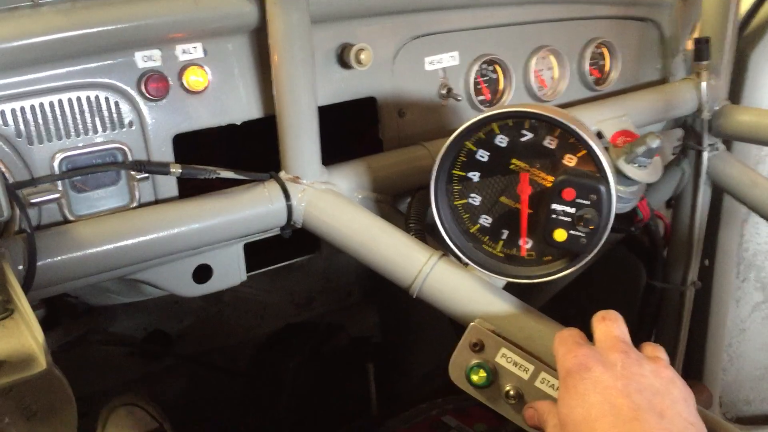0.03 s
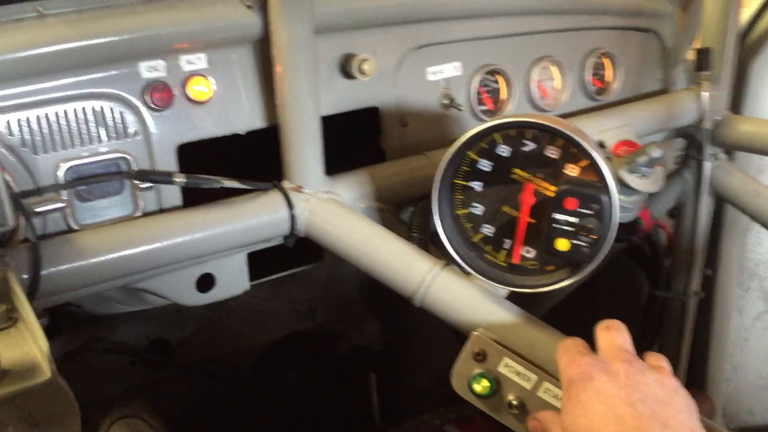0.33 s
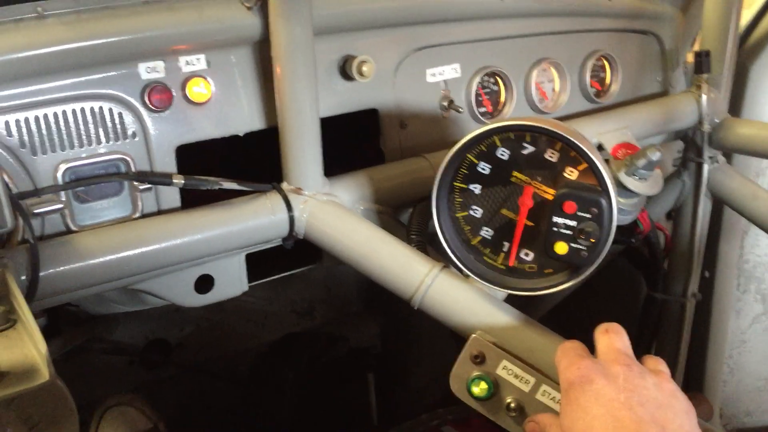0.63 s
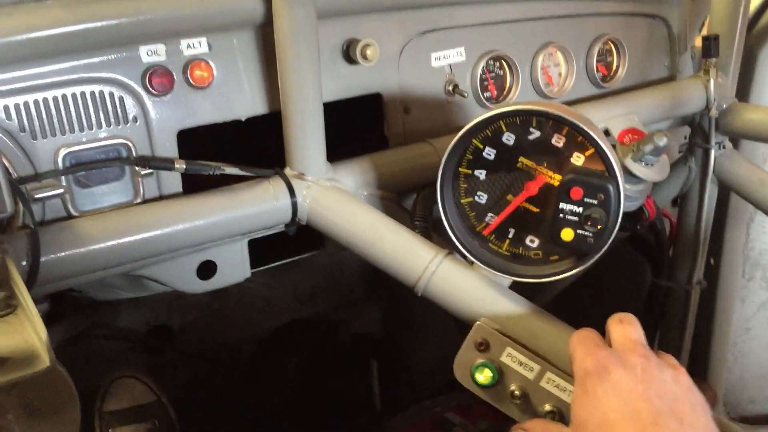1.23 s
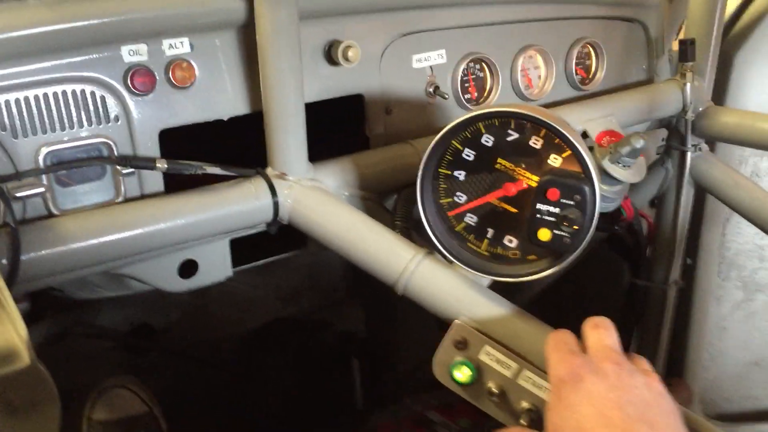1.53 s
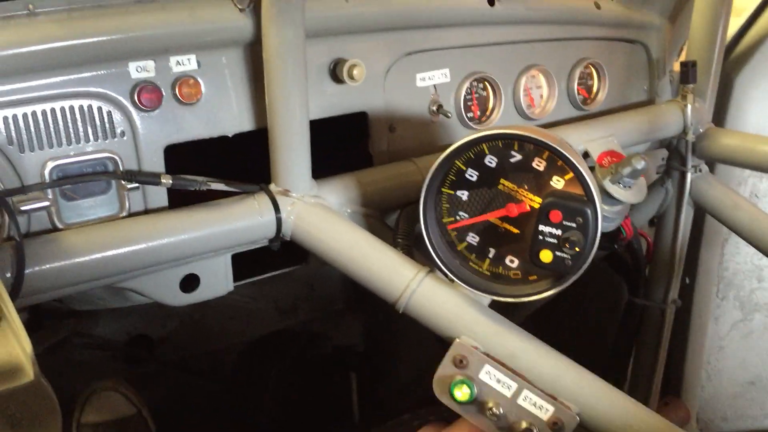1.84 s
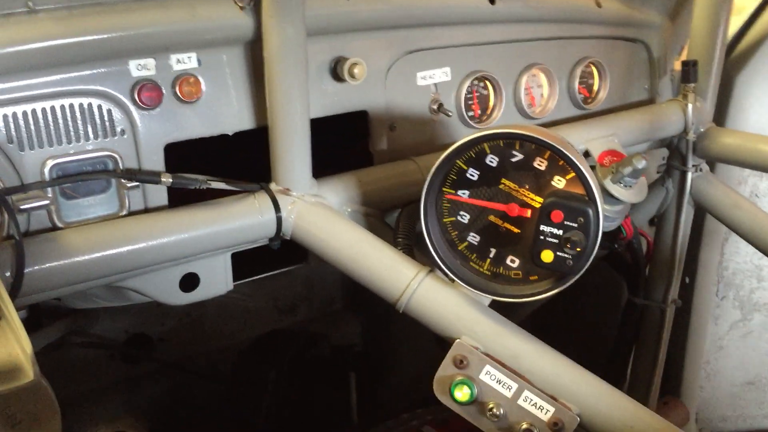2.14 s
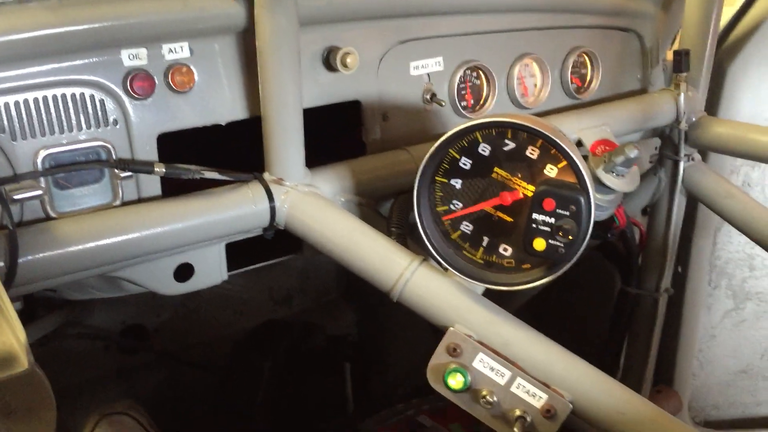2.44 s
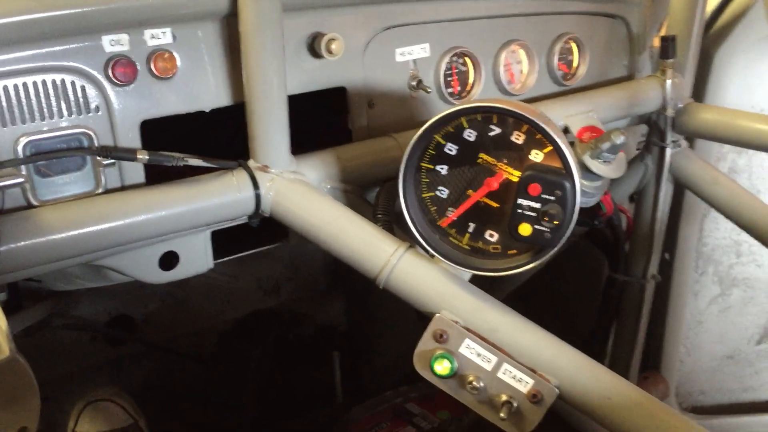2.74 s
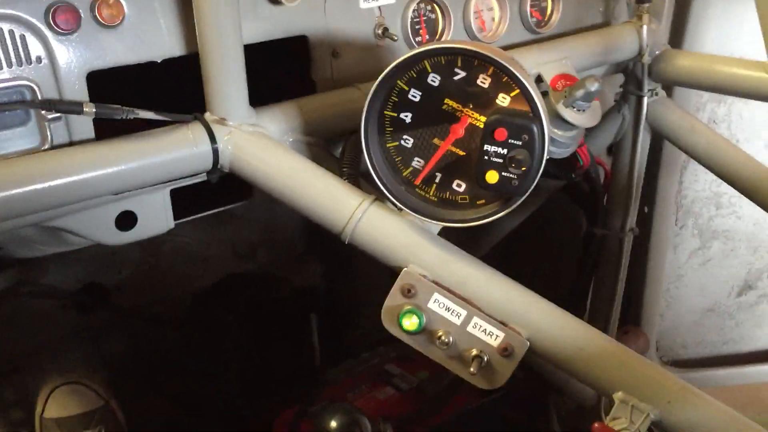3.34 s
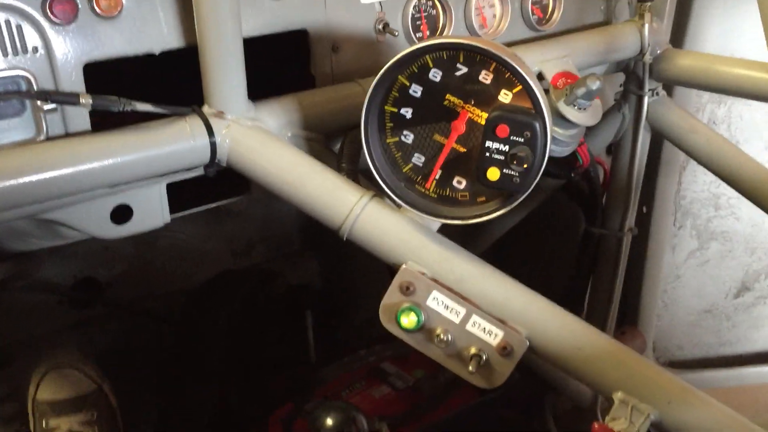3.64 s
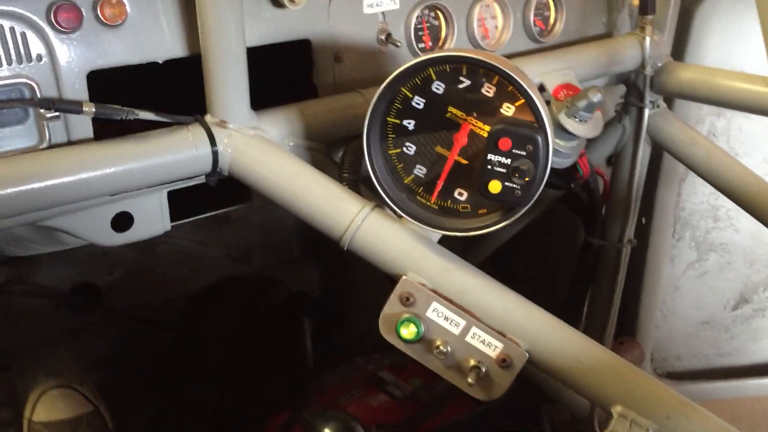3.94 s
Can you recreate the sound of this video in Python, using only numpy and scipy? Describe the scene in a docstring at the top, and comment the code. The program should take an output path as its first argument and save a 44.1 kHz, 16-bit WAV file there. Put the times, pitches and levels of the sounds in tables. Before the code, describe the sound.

A four-cylinder car engine is cranked by a grinding starter, fires unevenly with a bang, revs with a booming, raspy exhaust and sinks into rough chugs. The microphone is inside the resonant metal cabin and overloads slightly on peaks.

```python
"""Inside the bare steel cabin of a race car, a four-cylinder engine starts. A switch clicks over the
fuel pump, the starter's gear teeth grind and the first cylinders thump, one with a bang. The engine
catches, is revved once and falls to a lumpy idle that surges, then sags into separate chugs. Its
firings boom through the exhaust, their puffs of gas rasp and hiss, and the steel panels resonate.
The loudest peaks overload the microphone."""
import sys
import numpy as np
from scipy import signal
from scipy.fft import rfft, irfft
from scipy.io import wavfile
from scipy.ndimage import uniform_filter1d, map_coordinates

SR = 44100
rng = np.random.default_rng(int(sys.argv[2]) if len(sys.argv) > 2 else 0)


def wrap_up_sound(samples):
    """Save the sound to the file named by the first command line argument, as 16-bit audio."""
    columns = np.atleast_2d(samples).T
    # keep every value between -1 and 1, then stretch to whole-number steps
    tamed = np.clip(columns, -1, 1)
    steps = np.round(tamed * 32767).astype(np.int16)
    wavfile.write(sys.argv[1], SR, steps)


N = 176400

# The exhaust as it booms in the cabin. Each row: frequency in Hz, gain in dB.
PIPE_RESPONSE = [(25,-26.5),(52,-12.5),(80,-10),(105,-5.5),(135,-5.5),(162,3.5),(192,1.5),(240,-2),(285,-13),(370,-11.5),(445,-15),(900,-54.5)]
# Rasp and hiss of escaping gas. Each row: frequency in Hz, relative spectral density in dB.
RASP_SPECTRUM = [(120,-30.5),(300,1.5),(370,4),(460,2),(590,5),(850,-0.5),(1400,-1),(2200,-7.5),(3500,-11),(15000,-39)]
HISS_SPECTRUM = [(700,-23),(1500,2.5),(2800,2),(4200,0),(5000,-5.5),(6000,0),(7400,-7.5),(8700,-2.5),(10500,-10.5),(15500,-13)]


def undb(db):
    """Decibels to amplitude ratio."""
    return 10 ** (np.asarray(db) / 20)


def unit(x):
    """Scale to rms 1."""
    return x / np.sqrt(np.mean(x ** 2))


def steady(x):
    """Hold the rms over 50 ms at 1."""
    return x / np.sqrt(uniform_filter1d(x ** 2, size=2200) + 1e-9)


def clock():
    """Sample times in seconds."""
    return np.arange(N) / SR


def curve(table, column=1):
    """Linear interpolation of one column in time."""
    rows = np.array(table)
    return np.interp(clock(), rows[:, 0], rows[:, column])


def strike(start, decay, attack=0.00049, hold=0):
    """Linear rise, then exponential decay from start + hold; all in seconds."""
    age = clock() - start
    return np.clip(age / attack, 0, 1) * np.exp(-np.maximum(age - hold, 0) / decay)


def noise():
    """White Gaussian noise."""
    return rng.standard_normal(N)


def walk(rate):
    """Random drift of rms 1, with `rate` new values a second."""
    step = int(SR / rate)
    return unit(uniform_filter1d(np.repeat(noise()[:N // step + 1], step), step)[:N])


def repeating(turns):
    """Periodic noise: a rough pattern recurs at every turn of a shaft."""
    return unit(map_coordinates(noise(), [turns % 1 * N / turns[-1]], order=3))


def response(spectrum, hz):
    """Gain of a spectrum, interpolated in log frequency."""
    knots_hz, db = np.array(spectrum).T
    return undb(np.interp(np.log(np.maximum(hz, 1)), np.log(knots_hz), db))


def colour(x, spectrum):
    """Minimum-phase filter: folding the cepstrum makes it causal."""
    cepstrum = irfft(np.log(response(spectrum, np.arange(N + 1) * SR / (2 * N))))
    cepstrum[1:N] *= 2
    cepstrum[N + 1:] = 0
    return irfft(rfft(x, 2 * N) * np.exp(rfft(cepstrum)))[:N]


def resonate(x, hz, width_hz):
    """One resonance, gain 1 at its centre."""
    return signal.lfilter(*signal.iirpeak(hz, hz / width_hz, fs=SR), x)


def cabin(x):
    """Panel resonance and short reverberation off bare walls, which shifts as the microphone sways."""
    # Modes of the steel panels. Each row: frequency in Hz, gain in dB.
    panel_modes = [(368,4.5),(544,-2.5),(638,-2),(750,-3),(1030,3),(1183,2),(1297,2),(1373,-4.5),(1510,4),(1775,-0.5),(1978,-0.5),(2238,0),(2540,2.5)]
    t60_s, echo_db, sway_hz = 0.074, -5.5, 1.91
    x = x + sum(undb(db) * resonate(x, hz, width_hz=19.2) for hz, db in panel_modes)
    t = clock()[:SR // 4]
    tails = rng.standard_normal((2, len(t))) * np.exp(-np.log(1000) * t / t60_s)
    here, there = (signal.fftconvolve(x, tail / np.linalg.norm(tail))[:N] for tail in tails)
    sway = 2 * np.pi * sway_hz * clock()
    return x + undb(echo_db) * (np.cos(sway) * here + np.sin(sway) * there)


def fuel_pump():
    """A rotating machine radiates a tone over broadband noise."""
    # The pump's whirr. Each row: frequency in Hz, relative spectral density in dB.
    whirr_spectrum = [(40, -12), (298, -11), (1400, -9.5), (15000, -41)]
    hum_hz = 310.7
    hum = undb(-43.5) * unit(np.sin(2 * np.pi * hum_hz * clock()))
    whirr = undb(-33) * unit(colour(noise(), whirr_spectrum))
    return strike(0.037, decay=0.17, hold=1.0) * (hum + whirr)


def start_switch():
    """A brief impact has a broad spectrum: a bright click."""
    bright = unit(colour(noise(), [(1500, -41), (10000, 6), (15000, 5)]))
    return undb(-23) * strike(0.1237, decay=0.0065) * bright


def pinion():
    """Damped resonance: the pinion rings as it engages."""
    ring = unit(resonate(noise(), hz=2120, width_hz=400))
    return undb(-17.5) * strike(0.153, decay=0.03, attack=0.0052) * ring


def starter():
    """Gear-mesh noise: teeth grind on the flywheel, louder, slower and brighter at each compression."""
    # Compressions that load the starter. Each row: peak time in seconds, dB over the free run.
    compressions = [(0.256,2.5),(0.37,6.5),(0.437,4.5),(0.558,2.5),(0.664,8),(0.797,4.5),(.9,9),(0.996,5.5)]
    # Gear grind and motor growl. Each row: frequency in Hz, relative spectral density in dB.
    grind_spectrum = [(40,2),(70,16.5),(130,11),(210,12.5),(320,-1.5),(700,-2.5),(950,-4.5),(2000,-2.5),(3100,-2),(4500,-2),(6500,-6.5),(7600,-11.5),(9500,-13),(10500,-19.5),(15500,-25)]
    growl_spectrum = [(250,-19.5),(560,-8),(690,4.5),(800,-2),(1400,-10),(4000,-62)]
    mesh_hz, rise_hz_per_s, sag_hz_per_db, teeth = 195, 40, 3.5, 9
    t = clock()
    strain_db = sum(db * np.exp(-0.5 * ((t - peak) / 0.027) ** 2) for peak, db in compressions)
    level = undb(-21.5 + strain_db) * strike(0.14, decay=0.013, attack=0.016, hold=0.89)
    meshings = np.cumsum(mesh_hz + rise_hz_per_s * t - sag_hz_per_db * strain_db) / SR
    whine = repeating(meshings / teeth)
    grind = unit(colour(cabin(noise() + undb(-7) * whine), grind_spectrum))
    # The motor growls as it takes up the load.
    take_up = undb(-24) * strike(0.155, decay=0.034, attack=0.0066, hold=0.15)
    growl = unit(colour(cabin(noise() + whine), growl_spectrum))
    highpass = signal.butter(2, 7000, "high", fs=SR, output="sos")
    scrape = undb(-26 + strain_db) * unit(signal.sosfilt(highpass, noise()))
    return level * (grind + scrape) + take_up * growl


def first_firings():
    """Pressure transients: lone cylinders thump and crack, and unburnt fuel bangs in the pipe."""
    # Lone firings. Each row: start in seconds, level in dB.
    firings = [(0.18,-9),(0.376,-6.5),(0.42,1.5),(0.656,-5),(0.703,-10.5),(0.884,-6),(0.92,2),(0.994,-0.5),(1.023,2.5),(1.051,4),(1.134,-8.5),(1.16,-7),(1.199,-2),(1.285,-4.5)]
    # The thump rises as the engine catches. Each row: time in seconds, frequency in Hz.
    thump_pitch = [(.92,111.4),(1.05,130)]
    # Bangs in the exhaust. Each row: start in seconds, level in dB, decay in seconds.
    bangs = [(.424,-13,0.016),(1.024,-0.5,0.015),(1.056,-19.5,0.015),(1.163,-20.5,0.0099),(1.306,-11.5,0.0074),(1.362,-11.5,0.0099),(1.412,-14.5,0.015),(1.457,-6.5,.011),(1.793,-10,0.0083)]
    rise_s, ring_s, ring_hz = 0.0064, 0.012, 157.8
    thumps, crack_level = 0, 0
    for start, db in firings:
        age = np.maximum(clock() - start, 0)
        hz = np.interp(start, *zip(*thump_pitch))
        pulse = (age / rise_s) ** 2 * np.exp(2 - 2 * age / rise_s) * np.sin(2 * np.pi * hz * age)
        ring = age / ring_s * np.exp(1 - age / ring_s) * np.sin(2 * np.pi * ring_hz * age)
        thumps += undb(db) * (pulse + undb(-12.5) * ring)
        crack_level += undb(db - 28) * strike(start, decay=0.0057)
    bang_level = sum(undb(db) * strike(start, decay, attack=0.003) for start, db, decay in bangs)
    hiss = (crack_level + undb(-12.5) * bang_level) * unit(colour(noise(), HISS_SPECTRUM))
    return thumps + hiss + bang_level * unit(colour(cabin(noise()), RASP_SPECTRUM))


def chug_envelopes():
    """The idle's strong firings add in power: one envelope for their boom, one for their spit."""
    # Each row: start in seconds, boom in dB, spitting hiss in dB.
    chugs = [(2.817,-12.5,-31),(2.857,-11.5,-29),(2.891,-15.5,-32),(2.973,-15,-29),(3.013,-14.5,-29.5),(3.048,-16.5,-30),(3.11,-25,-32),(3.131,-15,-28),(3.16,-15.5,-30.5),(3.203,-14.5,-29),(3.244,-15,-35),(3.277,-15,-29),(3.303,-17.5,-42),(3.435,-30,-36),(3.51,-23.5,-53),(3.533,-31,-34.5),(3.62,-32,-34),(3.65,-18.5,-32),(3.709,-29,-32),(3.74,-19.5,-34),(3.77,-17.5,-30),(3.797,-18,-35.5),(3.865,-23,-28.5),(3.897,-18,-26),(3.965,-24,-27)]
    boom_power, spit_power = 0, 0
    for start, boom_db, spit_db in chugs:
        boom_power += (undb(boom_db) * strike(start, decay=0.033, attack=0.0055, hold=0.0055)) ** 2
        spit_power += (undb(spit_db) * strike(start, decay=0.03, attack=0.008)) ** 2
    return np.sqrt(boom_power), np.sqrt(spit_power)


def pipe_ring(x):
    """The pipe rings at its modes, each formed by two resonators in cascade."""
    # Each row: frequency in Hz, width of one resonator in Hz, level in dB.
    pipe_modes = [(161.6,99.6,0.5),(369,104,-15.5)]
    return sum(undb(db) * steady(resonate(resonate(x, hz, width), hz, width))
               for hz, width, db in pipe_modes)


def exhaust(firing_hz, firings, scatter):
    """Source and filter: the pipe shapes firing harmonics, uneven kicks and turbulent gas."""
    # Source level in dB of each harmonic of the firing rate, fundamental first.
    harmonics_db = [0.5, 0.5, -5, -7, -4, -8.5]
    # How far each cylinder strays from the mean strength, in relative units.
    cylinder_bias = [0.98, -1.3, 0.43, 0.015]
    # Unevenness of the firings. Each row: time in seconds, roughness from 0 to 1.
    roughness = [(1.35,0.74),(1.7,0.57),(1.88,0.44),(2.07,0.9),(2.33,0.43),(2.55,0.56),(2.9,0.42),(3.7,0.7)]
    dispersion_rad = 0.827  # pipe and cabin delay each harmonic differently and smear the pulse
    harmonics = 0
    for k, db in enumerate(harmonics_db):
        gain = undb(db) * response(PIPE_RESPONSE, (k + 1) * firing_hz)
        harmonics += gain * np.sin(2 * np.pi * (k + 1) * firings - dispersion_rad * k ** 2)
    cycle = np.maximum(firings, 0).astype(int)
    kicks = np.diff(cycle, prepend=0) * (scatter + np.array(cylinder_bias)[cycle % len(cylinder_bias)])
    uneven = steady(colour(unit(kicks) + noise(), PIPE_RESPONSE))
    rough = curve(roughness)
    return np.sqrt(1 - rough ** 2) * steady(harmonics) + rough * uneven


def engine():
    """Periodic combustion: each firing drives the exhaust, and its puff of gas modulates the noise."""
    # Engine speed. Each row: time in seconds, firings per second.
    speed = [(1.1,41.6),(1.3,58),(1.36,69.4),(1.45,90),(1.52,103.7),(1.63,88),(1.77,64),(1.88,96.4),(1.94,108),(2.02,120.5),(2.1,134),(2.28,119),(2.39,101),(2.5,79),(2.61,74),(2.77,55.8),(3.0,52.4),(3.24,54.3),(4,54)]
    # The running engine. Each row: time in seconds, then boom, rasp and treble hiss in dB.
    effort = [(1.1,-24,-27.5,-36),(1.275,-18,-30,-38),(1.305,-11.5,-20,-35),(1.39,-11.5,-22,-37),(1.49,-14.5,-21.5,-28.5),(1.6,-21.5,-28.5,-47),(1.775,-22.5,-32.5,-46),(1.8,-12.5,-21.5,-25.5),(1.9,-9.5,-11,-18.5),(1.955,-10,-15.5,-23),(2.04,-13.5,-11.5,-18),(2.11,-16.5,-12.5,-25),(2.16,-19.5,-19.5,-27),(2.33,-14,-21,-22),(2.44,-25,-26,-36),(2.59,-19,-30,-41),(2.72,-27,-34.5,-46.5)]
    wobble_cycles, puff_cycles, clatter_scatter_db = 0.04, 0.2, 2
    firing_hz = curve(speed)
    firings = np.cumsum(firing_hz) / SR + wobble_cycles * walk(30)
    cycle = np.maximum(firings, 0).astype(int)
    scatter, valve_scatter = np.sqrt(3) * rng.uniform(-1, 1, (N // 100, 2))[cycle].T
    running = np.clip((clock() - effort[0][0]) / 0.029 + 1, 0, 1)
    boom_level, rasp_level, hiss_level = (running * undb(curve(effort, k)) for k in (1, 2, 3))
    chug_level, spit_level = chug_envelopes()

    pipe = exhaust(firing_hz, firings, scatter)
    boom = boom_level * pipe + chug_level * pipe_ring(pipe)
    # The firing rate hums on with the throttle shut.
    fundamental = unit(np.sin(2 * np.pi * firings) * (1 + 0.3 * scatter))
    drone = running * undb(-24) * response(PIPE_RESPONSE, firing_hz) * fundamental

    puffs = 1 + np.exp(-(firings % 1) / puff_cycles)
    # Part of the rasp repeats with each crank turn, which is two firings.
    each_turn = unit(map_coordinates(noise(), [firings % 2 * SR / firing_hz.max()], order=1))
    gas = steady(colour(cabin(puffs * (noise() + 0.71 * each_turn)), RASP_SPECTRUM))
    rasp = np.hypot(rasp_level, undb(-14.5) * chug_level) * gas
    valves = puffs * undb(clatter_scatter_db * valve_scatter) * noise()
    clatter = hiss_level * unit(colour(cabin(valves), HISS_SPECTRUM))
    spit = spit_level * unit(colour(cabin(noise()), HISS_SPECTRUM))
    return drone + boom + rasp + clatter + spit


def scene():
    """Superposition of all sources in one channel."""
    return (engine() + starter() + first_firings() + fuel_pump() + start_switch() + pinion())[None]


def record(dry):
    """Soft saturation in the microphone rounds the peaks; a low-pass filter cuts the top."""
    ceiling, knee, top_hz = 0.73, 6, 15850
    rounded = dry / (1 + np.abs(dry / ceiling) ** knee) ** (1 / knee)
    return signal.sosfilt(signal.ellip(10, 0.2, 80, top_hz, fs=SR, output="sos"), rounded)


dry = scene()
out = record(dry)
wrap_up_sound(out)
```